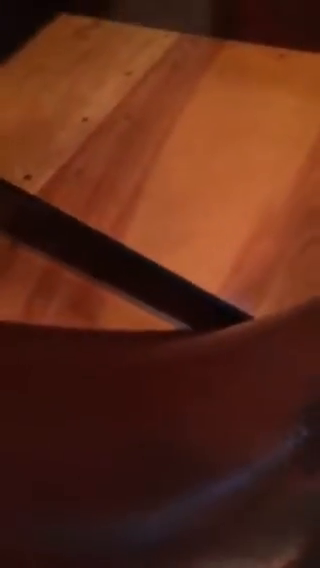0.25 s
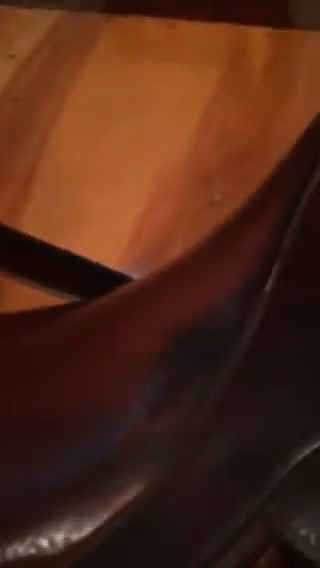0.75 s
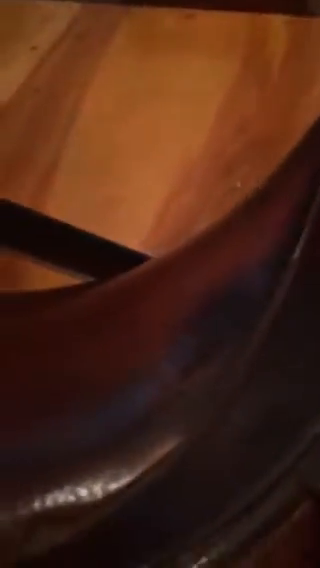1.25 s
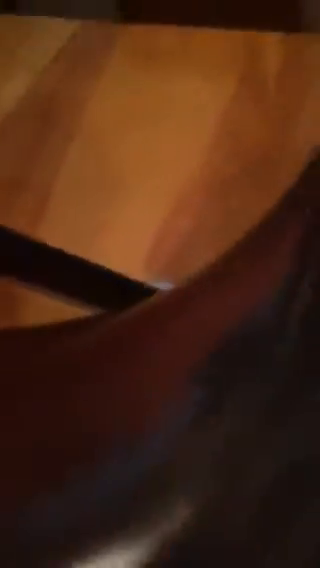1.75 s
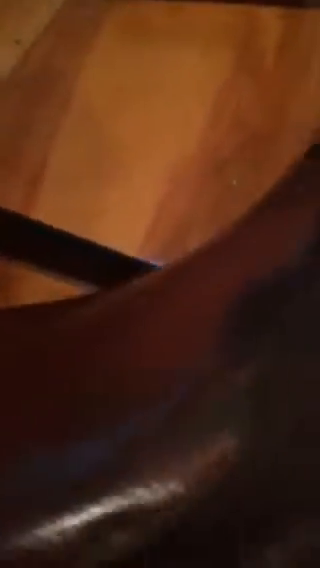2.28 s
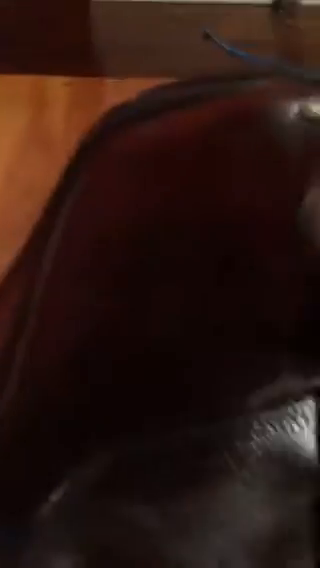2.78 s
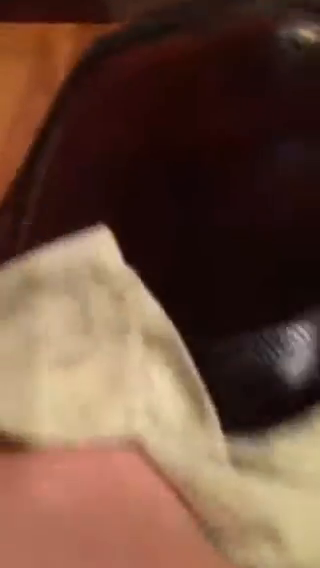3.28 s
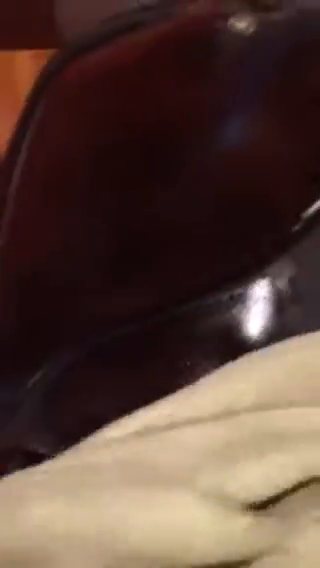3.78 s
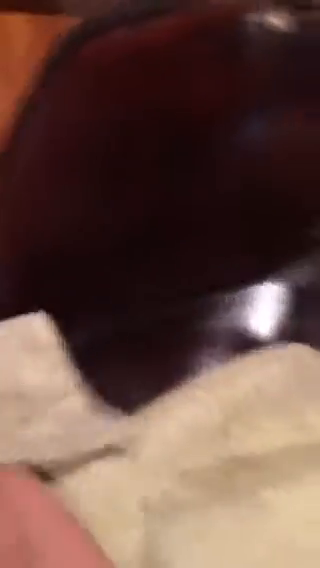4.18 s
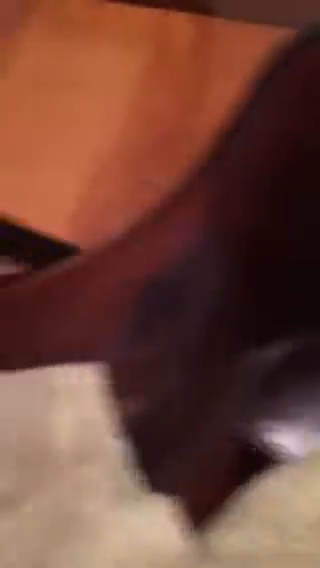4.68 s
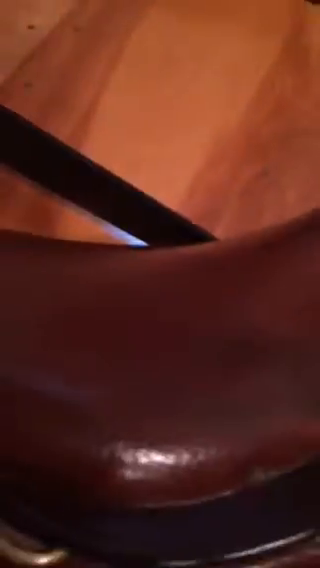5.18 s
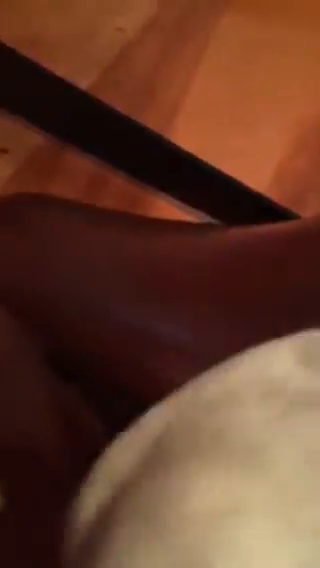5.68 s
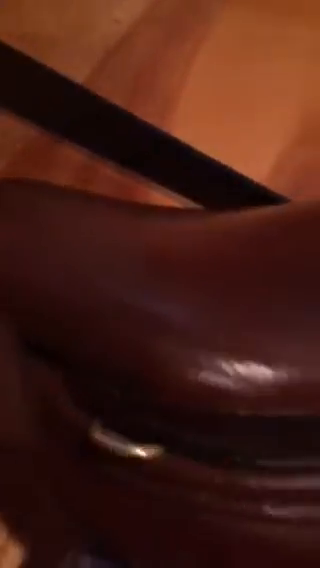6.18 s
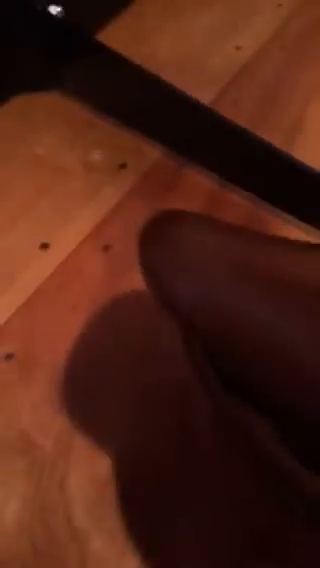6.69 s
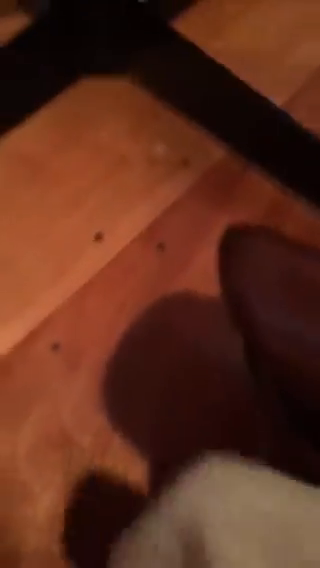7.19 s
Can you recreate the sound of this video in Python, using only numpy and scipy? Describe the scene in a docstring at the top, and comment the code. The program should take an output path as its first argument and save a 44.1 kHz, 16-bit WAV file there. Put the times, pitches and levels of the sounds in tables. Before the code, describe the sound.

Small clicks of fittings, then a soft cloth wipes leather in short hissing strokes with dull handling bumps, over a low hum in a quiet room.

```python
"""A quiet room, indoors, with a hand-held microphone close to a leather saddle: filtered noise is its still air,
and low sine lines are a hum, like an engine beyond the walls, that climbs unevenly until about 4.6 s.
Fittings soon click (noise snaps and damped rings) and the leather scuffs (bursts of stick and slip).
Then a soft cloth wipes in strokes, hissing and dragging (shaped friction noise). From about 1 s
handling makes dull bumps (short low rings). Clicks and bumps leave a brief reflected tail."""
import sys
import numpy as np
from scipy import signal
from scipy.fft import rfft, irfft
from scipy.io import wavfile
from scipy.ndimage import uniform_filter1d

SR = 44100
rng = np.random.default_rng(int(sys.argv[2]) if len(sys.argv) > 2 else 0)


def materialize(psi):
    """Save the field psi as 16-bit PCM at rate SR to the path in sys.argv[1].

    A 1-D psi becomes a single channel; in a 2-D psi each row is a channel.
    """
    bounded = np.clip(np.atleast_2d(psi).T, -1, 1)
    quanta = np.round(bounded * 32767).astype(np.int16)
    wavfile.write(sys.argv[1], SR, quanta)


N = 328443
TIME = np.arange(N) / SR


def amp(db):
    """Decibels to an amplitude factor."""
    return 10 ** (np.asarray(db) / 20)


def unit(x):
    """Scales to an rms of 1."""
    return x / np.sqrt(np.mean(x ** 2) + 1e-20)


def read(points, hz):
    """A spectrum table in dB at the given frequencies, interpolated over log frequency."""
    f, db = np.transpose(points)
    return np.interp(np.log(hz + 1), np.log(f + 1), db)


def follow(rows, t):
    """The columns of a curve table at the times t."""
    s, *columns = np.transpose(rows)
    return [np.interp(t, s, c) for c in columns]


def colour(x, points):
    """Gives x the spectrum of a table, at an rms of 1."""
    gain = amp(read(points, np.fft.rfftfreq(len(x), 1 / SR)))
    return unit(irfft(rfft(x) * gain, len(x)))


def impulse(points, size=2048):
    """A causal (minimum-phase) pulse of peak 1 with the spectrum of a table."""
    log_gain = np.log(amp(read(points, abs(np.fft.fftfreq(size, 1 / SR)))))
    pulse = np.fft.ifft(np.exp(np.conj(signal.hilbert(log_gain)))).real
    return pulse / abs(pulse).max()


def drift(hz, size=N):
    """Slow chance of rms 1, no faster than about hz."""
    f = np.fft.rfftfreq(size, 1 / SR)
    spectrum = rfft(rng.standard_normal(size)) * np.exp(-(f / hz) ** 2)
    return unit(irfft(spectrum, size))


def add(mix, s, sound):
    """Mixes a sound in at time s."""
    part = mix[max(round(s * SR), 0):][:len(sound)]
    part += sound[:len(part)]


# the still room at the microphone, relative spectrum: f/Hz, level/dB per Hz
ROOM_SPECTRUM = [(20, -15), (45, -1.5), (70, 6), (110, -1), (200, -7.5), (330, -15.5), (480, -17.5),
                 (750, -20.5), (1380, -26.5), (1900, -25.5), (2900, -29.5), (6900, -32.5), (14300, -38.5),
                 (15500, -43)]
ROOM_DB = -62.5  # rms level of the air


def room_air():
    """The air of the still room is steady noise with the room's spectrum."""
    return amp(ROOM_DB) * colour(rng.standard_normal(N), ROOM_SPECTRUM)


# the hum beyond the walls, before throb, waver and room lift: t/s, pitch f/Hz, level/dB
HUM_CURVE = [(0, 58.5, -72), (.4, 56.5, -75), (.74, 58.22, -58), (.94, 61.94, -58.5), (1.08, 72.03, -56),
             (1.48, 70.25, -62.5), (1.7, 67.96, -52.5), (2.0, 68, -55.5), (2.4, 71.05, -62.5),
             (3.0, 75.5, -57.5), (3.45, 78.8, -61), (3.75, 80.3, -60), (4.6, 84.1, -58), (4.9, 80, -54.5),
             (5.1, 77.5, -61.5), (5.35, 77.15, -55), (6.25, 79.27, -57.5), (6.38, 79.3, -61),
             (6.75, 79.5, -56.5), (7.44, 77, -60.5)]
# its lines: multiple of the pitch, relative level/dB
HUM_LINES = [(1, 0), (1.5, -16.5), (2, -9)]
# bass resonances of the room, which lift a line as it glides through: f/Hz, half width/Hz, lift level/dB
ROOM_RESONANCES = [(68.17, 0.86, 8), (123.4, 6.8, 10)]
# the hum throbs about this time while it picks up speed
THROB_PEAK_S, THROB_SPAN_S, THROB_HZ, THROB_DB = 0.937, 0.55, 7.8, 4.5


def hum(waver_db=3.0):
    """Three low lines share one changing speed; each wavers in level and phase, and room resonances lift it."""
    hz, db = follow(HUM_CURVE, TIME)
    turns = np.cumsum(hz) / SR
    lines = np.zeros(N)
    for order, order_db in HUM_LINES:
        lift_db = sum(mode_db / (1 + ((order * hz - mode_hz) / half_width) ** 2)
                      for mode_hz, half_width, mode_db in ROOM_RESONANCES)
        wander_turns = .04 * drift(hz=7)
        gain = amp(order_db + lift_db + waver_db * drift(hz=8.7))
        lines += gain * np.sin(2 * np.pi * (order * turns + wander_turns))
    t = TIME - THROB_PEAK_S
    throb_db = THROB_DB * np.cos(2 * np.pi * THROB_HZ * t) * np.exp(-(t / THROB_SPAN_S) ** 2)
    return np.sqrt(2) * amp(db + throb_db) * lines


def ring(hz, t60, size=4096):
    """One damped mode, pushed inwards first."""
    t = TIME[:size]
    return -np.sin(2 * np.pi * hz * t) * np.exp(-np.log(1000) * t / t60)


# clicks of fittings and stiff leather, close by:
# t/s, level/dB before the ring's damping, ring f/Hz, ring t60/s, snap level/dB relative to the click
CLICK_EVENTS = [(0.104, -30, 1090, 0.0066, -12), (.1042, -32, 333, 0.038, -37),
                (0.1673, -51, 1300, 0.0067, -6), (0.1809, -32.5, 810, 0.02, -25),
                (0.1942, -32.5, 2360, 0.0082, -26), (0.2276, -22.5, 1390, 0.0013, -31),
                (0.2282, -40, 3080, 0.0083, -17), (0.244, -33, 980, 0.0034, -27),
                (0.3557, -42.5, 1070, 0.0036, -28), (0.6758, -35.5, 1190, 0.0015, -15),
                (0.755, -46.5, 1190, 0.0018, -10), (1.7250, -23.5, 980, 0.0057, -41),
                (1.7282, -27, 975, 0.022, 0), (1.7286, -20, 1510, 0.0055, -23),
                (1.9325, -29, 1150, 0.0068, -27), (1.978, -49, 910, 0.011, -2),
                (2.2645, -47, 3840, 0.011, 7), (2.2685, -36, 643, 0.022, -14), (2.348, -32, 2070, 0.01, 1),
                (2.3495, -33.5, 740, 0.015, 10), (2.357, -39.5, 2840, 0.0082, 1),
                (2.484, -23, 1214, 0.0081, -4.5), (3.2, -21, 1139, 0.013, 3), (3.779, -35, 620, 0.02, -18),
                (6.222, -35.5, 550, 0.014, -9), (7.046, -39, 900, 0.0062, -17)]
# colour of a click's snap: f/Hz, level/dB per Hz
SNAP_SPECTRUM = [(150, -18), (500, -8), (900, -2), (1500, 1), (2200, -2), (3000, 2), (4200, -2), (5400, -9),
                 (6700, -1), (8500, -1), (10500, -12), (15000, -19)]


def clicks():
    """A sharp snap, a millisecond of scraping contact and one heavily damped ring."""
    out, snap = np.zeros(N), impulse(SNAP_SPECTRUM)
    contact = np.exp(-TIME[:len(snap)] / .0011)
    for s, db, hz, t60, snap_db in CLICK_EVENTS:
        scrape = colour(rng.standard_normal(len(snap)), SNAP_SPECTRUM) * contact
        add(out, s, amp(db) * ring(hz, t60))
        add(out, s, amp(db + snap_db) * (.3 * scrape - .7 * snap))
    return out


def reflections(x, low_t60=0.13, low_db=-13, high_db=-19, bass_hz=380, size=12000):
    """A short tail from floor and walls, in which the bass lasts longest."""
    t = TIME[:size]
    high_t60, delay_s = .09, .004
    taps = rng.choice([-1, 1], size) * (rng.random(size) < 2000 / SR) * (t > delay_s)  # 2000 echoes per s
    bass = signal.butter(2, bass_hz, fs=SR, output="sos")
    low, high = (taps * np.exp(-np.log(1000) * t / t60) for t60 in (low_t60, high_t60))
    low_tail = amp(low_db) * signal.sosfilt(bass, low / np.linalg.norm(low))
    high_tail = amp(high_db) * high / np.linalg.norm(high)
    return signal.oaconvolve(x, low_tail + high_tail)[:N]


def friction(size, per_s, spread_db, grain):
    """Sparse slips of uneven size over the smooth noise of countless fibres."""
    slips = (rng.random(size) < per_s / SR) * rng.choice([-1, 1], size)
    slips = slips * amp(spread_db * np.minimum(rng.exponential(1, size), 3.2))
    grain = np.clip(grain, 0, 1)  # share of the power in the slips
    return np.sqrt(grain) * unit(slips) + np.sqrt(1 - grain) * rng.standard_normal(size)


# short scuffs where the cloth or hand catches:
# t/s, nominal length/s, level/dB before the swell and sag, centre f/Hz, width/octaves, graininess/0-1
SCUFF_EVENTS = [(.163, 0.062, -43.5, 1050, 0.67, 0.36), (.164, 0.016, -49.5, 3260, 0.44, 0),
                (0.224, 0.064, -49, 690, 0.94, 0.3), (0.213, 0.032, -67, 2960, 0.48, 0.8),
                (0.288, 0.038, -64, 700, 1.14, 0.7), (0.497, 0.13, -70, 270, 0.61, 0.5),
                (1.039, 0.47, -88, 2000, 0.16, .3), (1.738, 0.065, -55, 895, 0.72, .2),
                (2.531, 0.093, -56.5, 260, 0.68, 0.16), (2.65, 0.06, -49.5, 3950, 1.04, 0.56),
                (2.783, 0.12, -61.5, 871, 0.63, 0), (3.22, 0.25, -59.5, 1560, 0.48, 0.2),
                (3.483, 0.14, -62.5, 3260, 0.3, .1), (3.677, 0.2, -61.5, 603, .35, .07),
                (4.2, 0.12, -61.5, 477, 0.77, 0.17), (5.169, .16, -59.5, 11000, .25, 0),
                (5.224, .06, -57, 327.4, 0.61, 0.24), (5.278, 0.07, -48.5, 290, 0.68, 0.15),
                (5.267, 0.085, -56, 2010, 0.94, 0.6), (5.614, .12, -47.5, 7440, 0.49, 0.05),
                (5.637, 0.021, -57.5, 640, 0.21, 1), (5.737, 0.11, -53.5, 273, 0.13, 0.47),
                (5.803, .025, -54, 338, 0.9, 0.5), (6.147, .065, -55, 220, 1.29, 0.47),
                (6.151, 0.089, -62.5, 1346, 0.39, 0.86), (7.028, .026, -46, 275, 0.58, .5),
                (7.029, 0.027, -51, 1704, 0.66, 0.9), (7.103, 0.064, -53, 1680, 0.31, 0),
                (7.151, .05, -64, 680, 0.5, 0.02)]


def scuffs(hold=0.53, end=1.12, late_gain=0.67):
    """Bursts of stick and slip swell quickly, sag and run out; hold and end are in nominal lengths."""
    out = np.zeros(N)
    for s, length, db, centre_hz, octaves, grain in SCUFF_EVENTS:
        slips = friction(size=32768, per_s=800, spread_db=3.5, grain=grain)
        hz = np.fft.rfftfreq(len(slips), 1 / SR)
        away = np.log2((hz + 1) / centre_hz) / octaves  # distance from the centre, in widths
        rasp = unit(irfft(rfft(slips) / (1 + (away / 2) ** 2) ** 2))
        progress = TIME[:len(rasp)] / length
        grip = 1 - np.exp(-progress / .09)
        sag = np.interp(progress, [0, hold, end], [1, late_gain, 0])
        add(out, s, amp(db) * grip * sag * rasp)
    return out


# strokes of the cloth, close to the microphone: start t/s, length/s, nominal hiss level/dB of the sliding weave,
# nominal drag level/dB of the pressed cloth, swell/dB from start to end, brightness/dB per octave, time to gain speed/s
STROKE_EVENTS = [(0.35, 0.4, -78, -73.5, -2, -1, 0.065), (0.499, 0.061, -74, -72, 10, -7, 0.074),
                 (1.13, 0.83, -92, -72.5, 22, 6, .08), (1.57, 0.21, -73, -69.5, 5, -2, 0.076),
                 (1.72, 0.26, -64, -61.5, 15.5, 3.5, 0.058), (2.027, .21, -61.5, -61, -2, 2, 0.13),
                 (2.25, 0.33, -62.5, -56.5, 2.5, 0, 0.024), (2.615, 0.13, -55.5, -55, -6.5, -4, 0.18),
                 (2.771, 0.056, -54.5, -52, -1.5, 1, 0.063), (2.864, 0.23, -61, -67, -12.5, 1, 0.099),
                 (3.104, .25, -57.5, -54.5, -5, -2.5, 0.18), (3.378, .19, -59.5, -58.5, -2, -5.5, 0.092),
                 (3.649, 0.15, -59.5, -61.5, 2.5, -2, 0.079), (3.822, 0.24, -65.5, -62.5, 0.5, -2, .08),
                 (4.181, .16, -61, -60, -2.5, -2, 0.11), (4.552, 0.29, -63, -63.5, -4, -1.5, 0.085),
                 (4.998, 0.335, -58, -63, 1.5, -0.5, .07), (5.452, 0.36, -57, -64, -3.5, -0.5, 0.094),
                 (6.034, 0.15, -56, -54, 1.5, -0.7, 0.087), (6.194, 0.13, -76, -70.5, -9, -2.5, .06),
                 (6.38, 0.23, -74.5, -70, -5, -4.5, 0.092), (6.90, .11, -81, -70.5, 7, 1, 0.023),
                 (7.035, 0.41, -63, -57, 0, -1.5, 0.014)]
STOP_S = 0.049  # the hand takes about this long to come to rest
BRIGHTEN = 0.55  # a stroke that speeds up also brightens (dB per octave for each dB of swell)


def wipe(t):
    """Each stroke gains speed, swells or eases, and stops: hiss gain, drag gain and brightness at times t."""
    start, length, hiss_db, drag_db, swell_db, brightness, rise_s = np.transpose(STROKE_EVENTS)[:, :, None]
    starting = 1 + np.tanh(2 * (t - start) / rise_s)
    stopping = 1 + np.tanh(2 * (start + length - t) / STOP_S)
    moving = starting * stopping / 4
    speed_db = swell_db * (np.clip((t - start) / length, 0, 1) - .5)
    slide = moving * amp(hiss_db + speed_db)
    press = moving * amp(drag_db + speed_db)
    # overlapping strokes share the brightness by their hiss
    tilt = (slide * (brightness + BRIGHTEN * speed_db)).sum(0) / (slide.sum(0) + 1e-12)
    return slide.sum(0), press.sum(0), tilt


def patches(shape, frames, bins):
    """Random blotches over time and frequency, of rms 1."""
    noise = rng.standard_normal(shape)
    return unit(uniform_filter1d(uniform_filter1d(noise, bins, axis=0), frames, axis=1))


# the weave sliding, relative spectrum: f/Hz, level/dB per Hz
WEAVE_SPECTRUM = [(900, -31), (2000, -15.5), (3000, -4), (4500, -3), (6500, 0.5), (8500, -1), (11000, -3),
                  (15000, -7.5)]
# the cloth dragging on the leather, relative spectrum: f/Hz, level/dB per Hz
DRAG_SPECTRUM = [(20, -18), (60, 18.5), (120, 10), (250, 9), (400, 4.5), (600, 2), (850, 1), (1400, 0.5),
                 (2200, -2.5), (3200, -7), (5000, -10), (10000, -39)]


def cloth(patchy_db=1.43, hollow_db=2.5, flutter_db=0.5, drag_db=-1.1, unsteady_db=2.0):
    """Fibres slip over the leather: a hiss that brightens as the cloth skims, and a grainy drag as it presses."""
    fibres = colour(friction(N, per_s=6000, spread_db=2.5, grain=.35), WEAVE_SPECTRUM)
    hz, t, z = signal.stft(fibres, SR, nperseg=512, noverlap=384)
    slide, press, brightness = wipe(t)
    tilt = amp(np.log2(np.maximum(hz, 2500) / 7000)[:, None] * brightness)
    # shifting folds favour one band of the hiss, then another
    folds = patches(z.shape, frames=16, bins=12)
    hiss = signal.istft(z * tilt * amp(patchy_db * folds), SR, nperseg=512, noverlap=384)[1][:N]
    # hollows under the hand give the drag narrow, passing resonances
    drag = colour(friction(N, per_s=700, spread_db=3, grain=.4), DRAG_SPECTRUM)
    z = signal.stft(drag, SR, nperseg=1024, noverlap=768)[2]
    hollows = patches(z.shape, frames=16, bins=4)
    drag = signal.istft(z * amp(hollow_db * hollows), SR, nperseg=1024, noverlap=768)[1][:N]
    hiss = hiss * np.interp(TIME, t, slide)
    drag = drag * np.interp(TIME, t, press) * amp(drag_db + unsteady_db * drift(hz=11))
    return (hiss + drag) * amp(flutter_db * drift(hz=36))


def low_cut(x, hz):
    """A second-order high-pass."""
    return signal.sosfilt(signal.butter(2, hz, "highpass", fs=SR, output="sos"), x)


# dull bumps of handling, close by:
# t/s, level/dB before mode levels and damping, ring f/Hz, hardness (edge level/dB relative to the bump)
BUMP_EVENTS = [(1.038, -43.5, 330, -13), (1.163, -39.5, 164, -5.5), (1.7284, -36, 139, 4),
               (1.7289, -20, 370, -1.5), (1.839, -40, 157.5, -10), (2.2683, -35.5, 364, -10),
               (2.347, -30, 354, -30), (2.432, -37, 271, -16), (2.5265, -21.5, 176, -4.5),
               (3.2, -36, 290, -32), (4.123, -34.5, 200, -9), (4.84, -33.5, 220, -11),
               (4.9285, -35.5, 190, -10), (5.758, -30.5, 113, -9.5), (5.9332, -33.5, 197, -7.5),
               (6.156, -38, 196, -7), (6.224, -31.5, 172, -8), (6.984, -41.5, 427.5, -8),
               (7.1663, -26.5, 180, -6), (7.376, -34.5, 186, -5)]
# what a bump rings: multiple of its ring f, relative level/dB
BUMP_RINGS = [(1.002, 5), (1.7, -4), (2.7, -16.5)]
# colour of a bump's hard edge: f/Hz, level/dB per Hz
EDGE_SPECTRUM = [(100, -8), (250, -1), (500, 0), (750, -5), (1100, -14), (1700, -29), (3000, -50),
                 (8000, -75)]
BUMP_CYCLES = 4.22  # cycles of its ring f in which a bump dies away by 60 dB


def bumps(lowest_hz=90):
    """A soft blow rings the body for a few cycles; a harder one adds a knock at its start."""
    out, edge = np.zeros(N), impulse(EDGE_SPECTRUM)
    yielding = 1 - np.exp(-(TIME[:4096] / .0011) ** 2)
    for s, db, hz, hard_db in BUMP_EVENTS:
        t60 = BUMP_CYCLES / hz
        body = sum(amp(mode_db) * ring(hz * k, t60 / np.sqrt(k)) for k, mode_db in BUMP_RINGS)
        add(out, s, amp(db) * yielding * body)  # the padding gives way, so the ring starts softly
        add(out, s, -amp(db + hard_db) * edge)
    return low_cut(out, lowest_hz)  # a small body radiates little deep bass


def scene():
    """Everything reaches one microphone, so both channels are alike."""
    knocks = clicks() + bumps()
    mono = room_air() + hum() + knocks + reflections(knocks) + scuffs() + cloth()
    return np.array([mono, mono])


def record(dry):
    """The recorder's band limit: a low-pass at 15450 Hz."""
    band_limit = signal.firwin(511, 15450, window=("kaiser", 9), fs=SR)
    return signal.oaconvolve(dry, band_limit[None], "same")


dry = scene()
out = record(dry)
materialize(out)
```